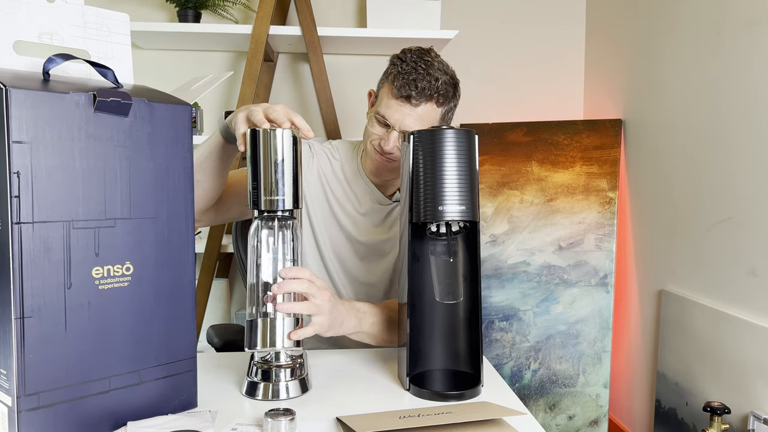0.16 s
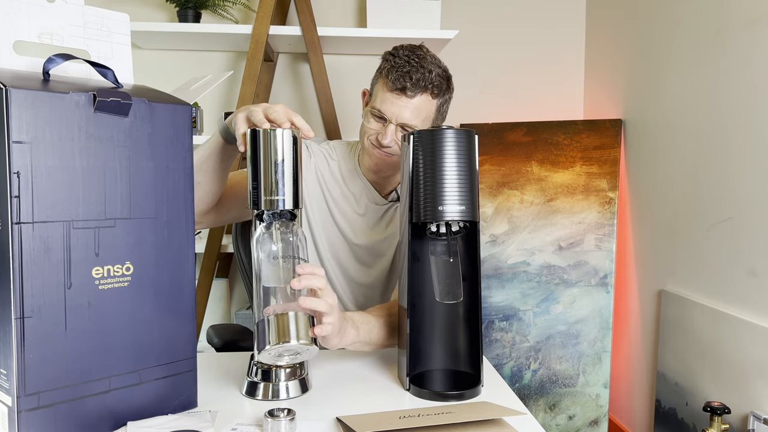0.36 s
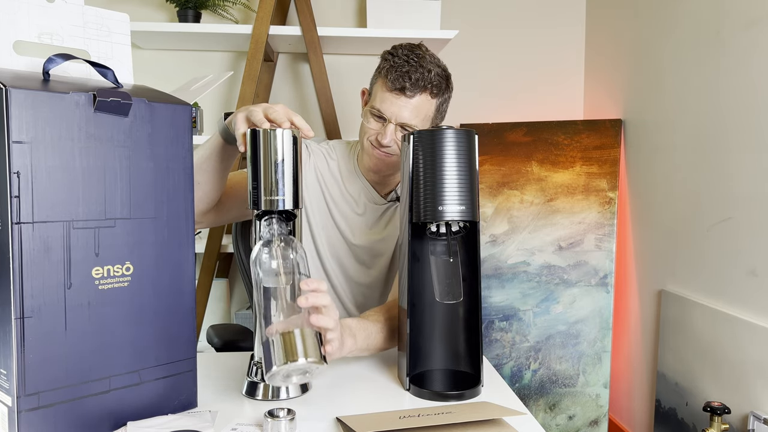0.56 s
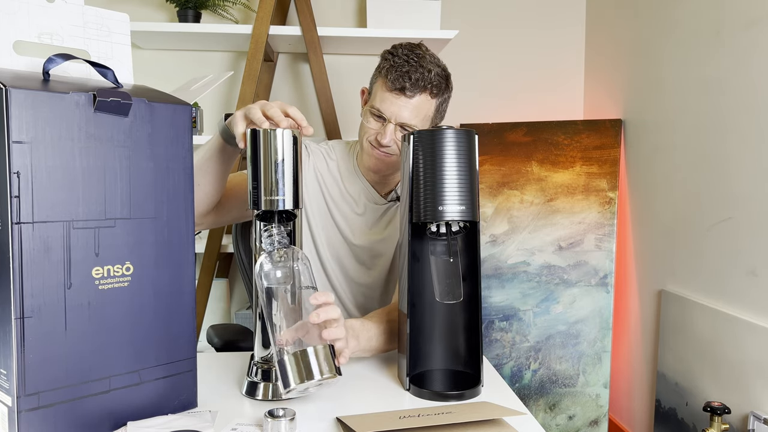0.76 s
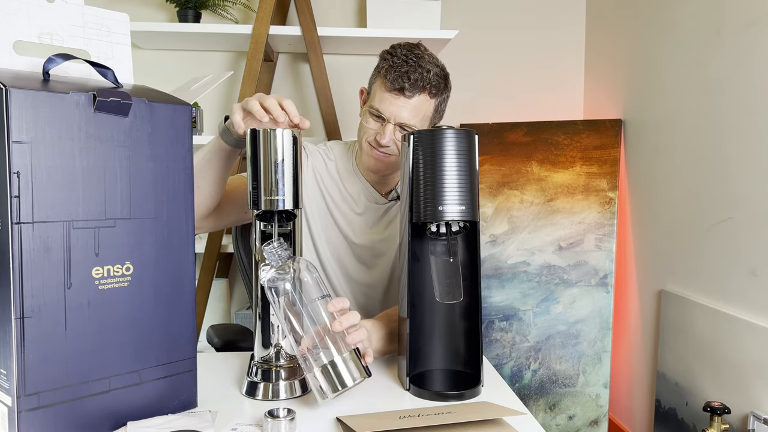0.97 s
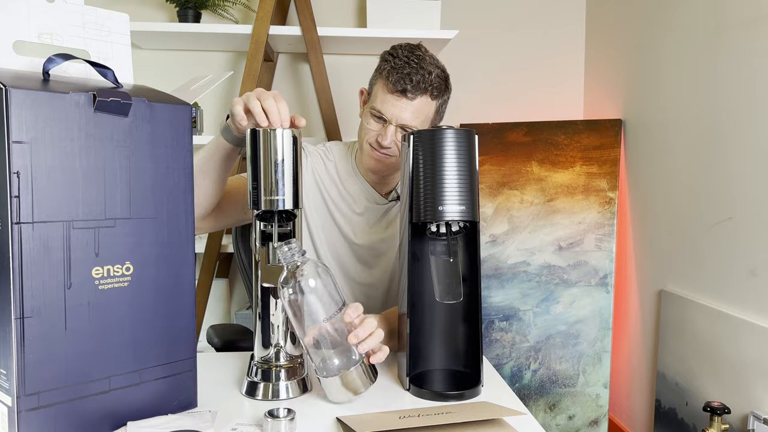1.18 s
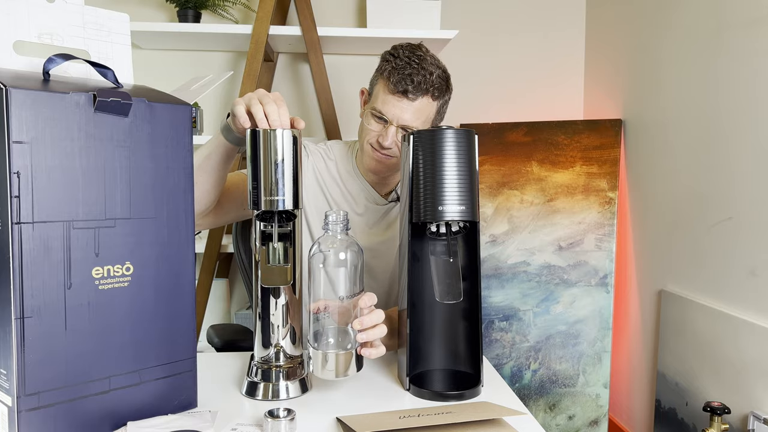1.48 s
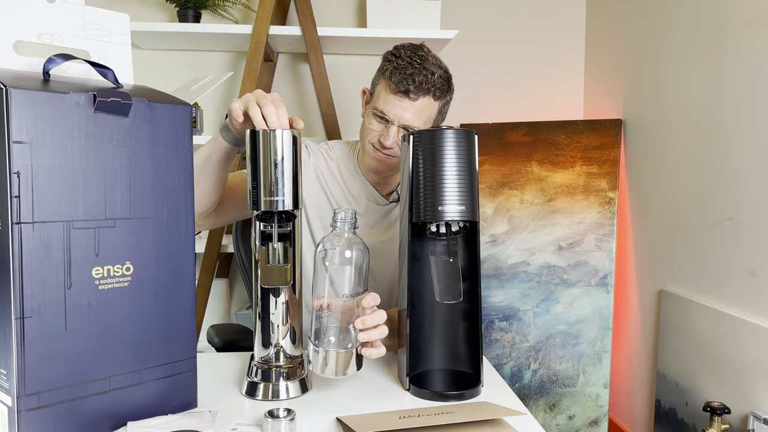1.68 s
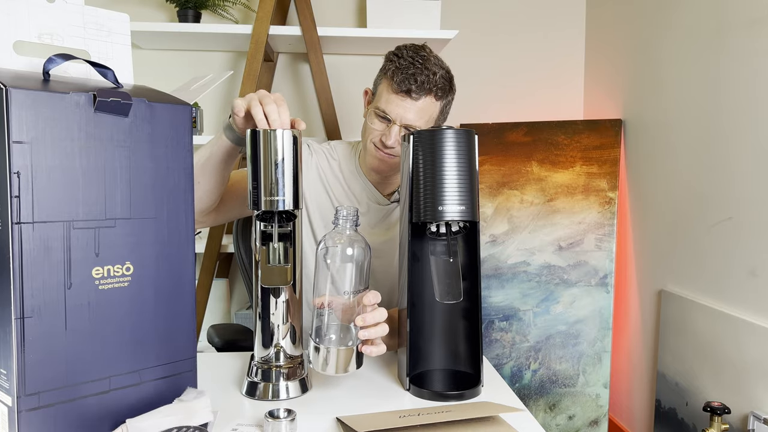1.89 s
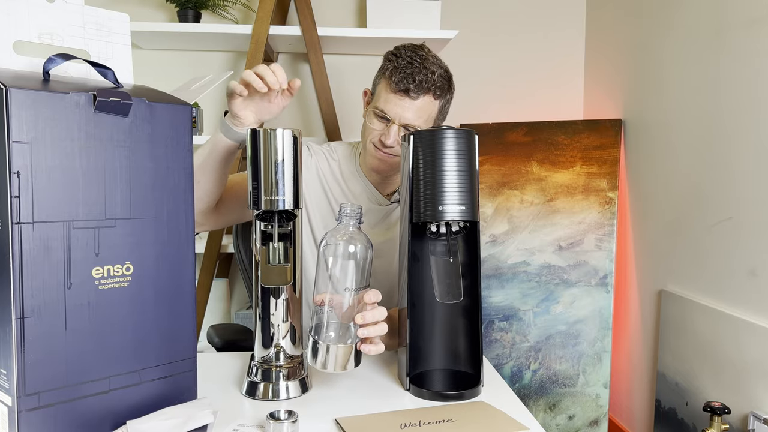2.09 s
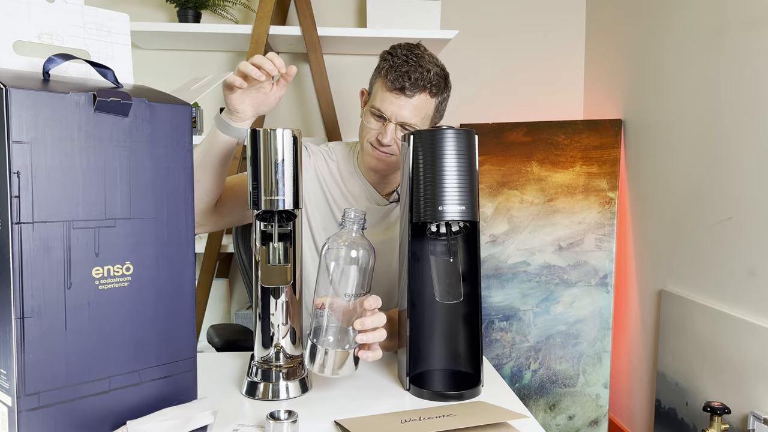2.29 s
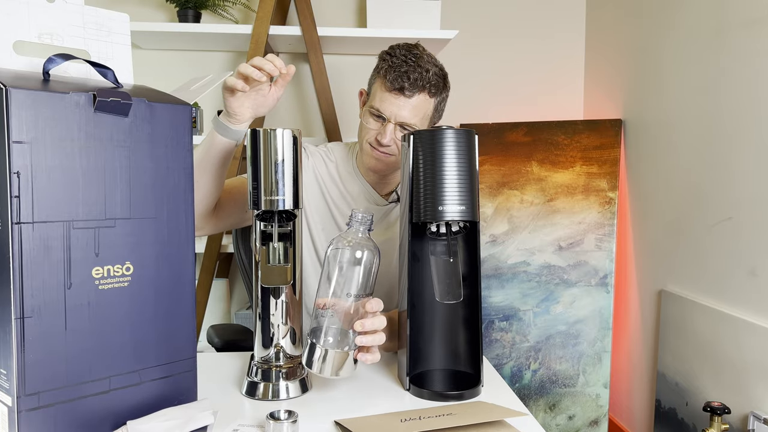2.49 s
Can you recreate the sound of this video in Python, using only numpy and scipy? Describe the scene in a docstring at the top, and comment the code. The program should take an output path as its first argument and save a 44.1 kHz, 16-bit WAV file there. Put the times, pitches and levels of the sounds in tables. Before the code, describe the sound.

Gas vents from a soda machine in a loud, bright, fading hiss. Before it come a thin leak, a sharp clack, a metallic clink and a hollow knock as the bottle is removed, heard close in a small room.

```python
"""Soda maker, close up

One microphone stands near the machine in a small room. As the bottle is taken out, gas leaks at its
neck until the seal lets go with a loud clack; the bottle clinks on the metal nozzle and knocks
hollowly on the stand. Then the top is pressed: the valve squeals open and carbon dioxide vents
in a bright hiss that sputters briefly and dies away."""
import sys
import numpy as np
from scipy import signal
from scipy.fft import rfft, irfft, next_fast_len
from scipy.io import wavfile
from scipy.ndimage import uniform_filter1d, minimum_filter1d

SR = 44100
rng = np.random.default_rng(int(sys.argv[2]) if len(sys.argv) > 2 else 0)


def persist_wave(psi):
    """Save psi, clipped to +-1, as 16-bit WAV."""
    counts = np.round(np.clip(psi, -1, 1) * 32767).astype(np.int16)
    wavfile.write(sys.argv[1], SR, np.atleast_2d(counts).T)


N = 116865
T = np.arange(N) / SR


def from_db(db):
    """Decibels to gain."""
    return 10 ** (np.asarray(db) / 20)


def at_hz(points, hz):
    """Read a table on a log-frequency axis."""
    table_hz, values = np.transpose(points)
    return np.interp(np.log(hz + 1e-9), np.log(table_hz), values)


def noise(colour, tilt_db=0):
    """Noise of a given colour, tilted by tilt_db per octave above 1 kHz."""
    size = next_fast_len(N)
    hz = np.maximum(np.fft.rfftfreq(size, 1 / SR), 20)
    octaves = np.log2(np.maximum(hz / 1000, 1))
    gain = from_db(at_hz(colour, hz) + tilt_db * octaves)
    return irfft(rfft(rng.standard_normal(size)) * gain, size)[:N]


def coloured(x, colour):
    """A minimum-phase filter with the given colour: nothing sounds early."""
    size = 2 * next_fast_len(N // 2 + SR // 4)
    gain = from_db(at_hz(colour, np.fft.rfftfreq(size, 1 / SR)))
    cepstrum = irfft(np.log(gain), size)
    cepstrum[1:size // 2] *= 2
    cepstrum[size // 2 + 1:] = 0
    return irfft(rfft(x, size) * np.exp(rfft(cepstrum)), size)[:N]


def wander(rate_hz):
    """Smooth random drift with a standard deviation of 1."""
    pole = np.exp(-2 * np.pi * rate_hz / SR)
    drift = signal.lfilter([1], [1, -2 * pole, pole * pole], rng.standard_normal(N + SR))[SR:]
    return drift / drift.std()


def decay(start_s, t60_s):
    """An envelope that jumps up at start_s and falls 60 dB in t60_s."""
    return (T >= start_s) * np.exp(-np.log(1000) * np.clip((T - start_s) / t60_s, 0, 10))


def ring(start_s, hz, t60_s):
    """One struck mode: a dying sine."""
    return np.sin(2 * np.pi * hz * (T - start_s)) * decay(start_s, t60_s)


def contact(start_s, t60_s, grit):
    """Force of a blow: a rough burst holds the share grit of the energy, a clean click the rest."""
    burst = decay(start_s, t60_s)
    force = np.sqrt(grit) * rng.standard_normal(N) * burst
    force[int(start_s * SR)] += np.sqrt((1 - grit) * np.sum(burst ** 2))
    return force


def struck(hits, colour, modes, room, crack_t60_s, grit, wet_db, ring_db):
    """Each hit cracks; the hardest rings the modes, which waver as if beating with room reflections."""
    force = sum(from_db(db) * contact(start_s, crack_t60_s, grit) for start_s, db in hits)
    hardest_s = max(hits, key=lambda hit: hit[1])[0]
    ringing = 0
    for k, (hz, db, t60_s) in enumerate(modes):
        waver = 1 + 0.3 * wander(rate_hz=22)
        ringing += (-1) ** k * from_db(db + ring_db) * ring(hardest_s, hz, t60_s) * waver
    return in_room(coloured(force, colour), room, wet_db) + ringing


# Reverberation of the small room: frequency_hz, t60_s
ROOM_DECAY = [(60, 0.44), (200, 0.96), (1000, 0.59), (3000, 0.66), (8000, 0.45), (13000, .25)]


def room_response(gap_s=0.006):
    """The walls answer after gap_s: dense early reflections and a tail that dies band by band."""
    tail, edges_hz = 0, np.geomspace(30, 18000, 12)
    for low, high in zip(edges_hz, edges_hz[1:]):
        bandpass = signal.butter(2, [low, high], "band", fs=SR, output="sos")
        band = signal.sosfilt(bandpass, rng.standard_normal(N))
        tail += band * decay(gap_s, at_hz(ROOM_DECAY, np.sqrt(low * high)))
    early = from_db(8) * rng.standard_normal(N) * decay(gap_s, t60_s=0.16)
    response = (early + tail)[:SR]
    return response / np.sqrt(np.sum(response ** 2))


def in_room(x, room, wet_db):
    """The direct sound reaches the microphone, then its reflections."""
    return x + from_db(wet_db) * signal.fftconvolve(x, room)[:N]


# Echoes off hard surfaces close to the machine: delay_ms, gain
NEAR_ECHOES = [(.9, 0.067), (2.3, 0.078), (4.1, 0.067)]


def near_surfaces(x):
    """Close reflections ripple the colour of a hiss."""
    return x + sum(gain * np.interp(T - ms / 1000, T, x, left=0) for ms, gain in NEAR_ECHOES)


# The quiet room at the microphone: frequency_hz, density_db
ROOM_COLOUR = [(25, -38.5), (70, -32), (100, -43), (170, -34.5), (290, -47.5), (400, -48), (900, -52),
               (2000, -64.5), (4000, -70), (16000, -77)]


def room_tone(hum_hz=289.4, hum_db=-64.5):
    """Low background noise with a faint, slightly wavering hum."""
    waver = 1 + 0.13 * wander(rate_hz=2.3)
    hum = from_db(hum_db) * waver * np.sin(2 * np.pi * hum_hz * T)
    return hum + noise(ROOM_COLOUR)


# Plastic on plastic, for rubs and taps: frequency_hz, density_db
PLASTIC_COLOUR = [(40, -50), (300, -26.5), (650, -15), (1700, -17), (2800, -26), (4000, -33), (5500, -33),
                  (8000, -39), (12000, -34), (16000, -58)]
# Slides in the holder: start_s, length_s, level_db, ring_hz, ring_db, tilt_db_per_octave
RUBS = [(.77, 0.21, -26, 292.4, -25.5, -13), (1.396, 0.082, -32.5, 4500, -33, 2)]


def bottle_rubs(pitch_spread=0.035):
    """The bottle rubs on its holder: soft sliding noise with one rough resonance."""
    out = 0
    for start_s, length_s, db, ring_hz, ring_db, tilt_db in RUBS:
        progress = np.clip((T - start_s) / length_s, 0, 1)
        stroke = np.sqrt(np.abs(np.sin(np.pi * progress)))
        hz = ring_hz * (1 + pitch_spread * wander(ring_hz * pitch_spread))
        tone = np.sin(2 * np.pi * np.cumsum(hz) / SR)
        out += from_db(db) * stroke * (noise(PLASTIC_COLOUR, tilt_db) + from_db(ring_db) * tone)
    return out


# Light plastic taps and creaks: start_s, level_db, ring_hz, ring_db, tilt_db_per_octave
TAPS = [(0.055, -10.5, 1720, -28, 3), (.155, -0.5, 760, -36.5, -0.5), (0.18, -1.5, 1870, -37, -8.5),
        (0.1922, 0, 1903, -30, 4.5), (0.43, -17.5, 1100, -33.5, -0.5), (0.514, -9, 1810, -47.5, 4.5),
        (.5305, 2, 1764, -27.5, 3), (1.012, -8, 1360, -29, -5), (1.056, -5, 1107, -22, -5),
        (1.066, 6.5, 1170, -39, -1.5), (1.3695, -15.5, 588, -14.5, 2), (1.3765, -10, 780, -23.5, -3.5)]


def bottle_taps(attack_s=0.0025):
    """The bottle shifts in its holder: small ticks, each with one brief resonance."""
    out = 0
    for start_s, db, ring_hz, ring_db, tilt_db in TAPS:
        attack = np.clip((T - start_s) / attack_s, 0, 1)
        tick = noise(PLASTIC_COLOUR, tilt_db) * decay(start_s, t60_s=0.045)
        resonance = from_db(ring_db) * ring(start_s, ring_hz, t60_s=0.06)
        out += from_db(db) * attack * (tick + resonance)
    return out


# Course of the leak at the neck: time_s, level_db
LEAK_LEVEL = [(0, 4.5), (.12, 5), (.22, 9.5), (.33, -12), (.5, -29), (.7, -8), (.98, -10.5), (1.2, -11),
              (1.33, -24), (1.44, -22), (1.52, -28), (1.61, -22), (1.72, -28)]
# Its hiss: frequency_hz, density_db
LEAK_COLOUR = [(300, -47.5), (1200, -46), (1700, -48.5), (2400, -47), (3200, -42.5), (4600, -49.5),
               (6300, -43), (7800, -42.5), (9500, -46), (11800, -41), (14000, -44.5), (16000, -54.5)]


def neck_leak():
    """Gas seeps past the neck in a thin hiss that comes and goes, fading as the pressure drops."""
    return noise(LEAK_COLOUR) * from_db(np.interp(T, *np.transpose(LEAK_LEVEL)))


# Whistles at the neck, then the valve: start_s, length_s, start_hz, end_hz, level_db, width_hz
WHISTLES = [(0, 0.33, 11200, 10950, -42.5, 486), (0.269, .022, 13100, 13300, -23, 700),
            (.272, 0.075, 13900, 14000, -34, 700), (1.213, .19, 13400, 10200, -59, 400),
            (1.789, 0.019, 6480, 6910, -25.5, 130), (1.787, 0.033, 9760, 9100, -29.5, 700),
            (1.789, 0.045, 3520, 3300, -35, 440), (1.802, 0.02, 2220, 2320, -28.5, 70),
            (1.81, 0.099, 2287, 2270, -30, 24.8)]


def gap_whistles(attack_share=0.22):
    """Gas sings in unsteady glides that swell quickly and fade as a narrow gap opens or shuts."""
    out = 0
    for start_s, length_s, start_hz, end_hz, db, width_hz in WHISTLES:
        progress = np.clip((T - start_s) / length_s, 0, 1)
        hz = start_hz + (end_hz - start_hz) * progress + width_hz / 2 * wander(width_hz)
        swell = np.interp(progress, [0, attack_share, 1], [0, 1, 0]) ** 1.5
        out += 2 * from_db(db) * swell * np.sin(2 * np.pi * np.cumsum(hz) / SR)
    return out


# Bottle against nozzle: start_s, level_db
CLINKS = [(.5405, -29), (.5797, -3), (.5818, 2.5), (.5845, 5)]
# The contact's spectrum: frequency_hz, gain_db
CLINK_COLOUR = [(40, -26), (250, -24), (700, -15.5), (1000, 1), (1350, -12.5), (1800, 3.5), (2100, -12.5),
                (2400, -4.5), (3400, -11.5), (5000, -16), (7000, -35.5), (12000, -24), (16000, -50)]
# Modes of the nozzle: pitch_hz, level_db, t60_s
NOZZLE_MODES = [(133, -35, .3), (1040, -26, 0.33), (1164, -34.5, 0.72), (1715, -39.5, 0.8),
                (1850, -30.5, .3), (1927, -36.5, 0.49), (2420, -42, 0.58), (3040, -31.5, .31),
                (2915, -33.5, 0.42), (3176, -47.5, .6), (3838, -45, .28), (4312, -49, 0.23)]


def nozzle_clink(room):
    """The bottle catches the metal nozzle and sets it ringing."""
    return struck(CLINKS, CLINK_COLOUR, NOZZLE_MODES, room,
                  crack_t60_s=0.018, grit=0.94, wet_db=-5, ring_db=-1.5)


# Bottle against stand: start_s, level_db
KNOCKS = [(1.0957, 3), (1.1115, -10.5)]
# The contact's spectrum: frequency_hz, gain_db
KNOCK_COLOUR = [(40, -24), (150, -2), (280, -8.5), (500, 0), (680, -4), (820, 10), (1080, 13), (1450, -3.5),
                (1800, 0.5), (2400, -16.5), (6000, -31), (12000, -28), (16000, -47.5)]
# Modes of the bottle: pitch_hz, level_db, t60_s
BOTTLE_MODES = [(118.8, -35.5, 1), (172, -26, 0.6), (385, -24.5, 0.25), (522, -35.5, 0.48),
                (639, -33.5, .4), (815, -26, 0.34), (904, -37.5, 0.19), (972, -34.5, 0.39),
                (1050, -20, 0.16), (1060, -30, .18)]


def bottle_knock(room):
    """The hollow bottle knocks on the stand and resonates."""
    return struck(KNOCKS, KNOCK_COLOUR, BOTTLE_MODES, room,
                  crack_t60_s=0.02, grit=0.5, wet_db=-4, ring_db=0.5)


# Jolts as the seal gives way: start_s, level_db
CLACKS = [(.2203, -12), (.2232, 10), (.2272, 1.5), (.2385, -2.5)]
# The burst's spectrum: frequency_hz, gain_db
CLACK_COLOUR = [(30, -12), (70, -15), (90, -12.5), (160, 0.5), (310, -2), (510, 6.5), (700, 0), (1070, 7.5),
                (1400, -5.5), (2400, -7), (5500, -13), (9000, -12.5), (11500, -4.5), (16000, -23)]
# Low boom of the room and ringing of the housing after the clack: pitch_hz, level_db, t60_s
CLACK_MODES = [(44.9, -43.5, .7), (72.5, -33.5, 0.56), (116, -33.5, 1), (177, -32.5, 0.64),
               (205, -46.5, 0.74), (367, -35, 0.33), (546.6, -12.5, 0.18), (1156, -20, .16),
               (1660, -33.5, .2)]


def seal_clack(room):
    """The seal lets go in a rough burst; the room booms low and the housing rings above it."""
    return struck(CLACKS, CLACK_COLOUR, CLACK_MODES, room,
                  crack_t60_s=0.063, grit=1.0, wet_db=-8, ring_db=1)


# Puffs at the vent: start_s, level_db
SPUTTERS = [(1.785, -7), (1.933, -2), (1.942, -1), (1.956, -0.5), (1.9633, -1.5), (2.011, -5.5)]
# Their spectrum: frequency_hz, density_db
SPUTTER_COLOUR = [(30, -43), (120, -14.5), (350, -12), (800, -14.5), (1500, -16.5), (2000, -21.5),
                  (4000, -24), (16000, -39)]


def jet_sputters(t60_s=0.053):
    """The jet sputters in low, rough puffs."""
    puffs = sum(from_db(db) * decay(start_s, t60_s) for start_s, db in SPUTTERS)
    return noise(SPUTTER_COLOUR) * puffs


# Gas flow through the open valve: time_s, level_db
VALVE_FLOW = [(1.772, -42), (1.783, -28.5), (1.79, -16.5), (1.814, -7.5), (1.865, -0.5), (1.96, -0.5),
              (2.06, -2.5), (2.23, -7.5), (2.38, -13), (2.5, -18), (2.65, -25.5)]
# The jet from close by: frequency_hz, density_db
JET_COLOUR = [(30, -29), (170, -25), (450, -30), (1100, -23), (1900, -26.5), (3500, -26.5), (5800, -22.5),
              (6400, -18), (7300, -16.5), (8400, -17), (9600, -13), (10500, -13), (12100, -5.5),
              (13500, -9), (16000, -26)]


def vent_jet(flicker_db=0.6, dulling_db_per_db=0.013, treble_hz=6000):
    """Venting gas makes a turbulent hiss; its treble fades a little faster than the flow."""
    flow_db = np.interp(T, *np.transpose(VALVE_FLOW))
    valve_open = T > VALVE_FLOW[0][0]
    hiss = noise(JET_COLOUR) * from_db(flow_db + flicker_db * wander(rate_hz=28)) * valve_open
    low = signal.sosfilt(signal.butter(1, treble_hz, fs=SR, output="sos"), hiss)
    return low + (hiss - low) * from_db(dulling_db_per_db * flow_db)


def scene():
    """Machine and room at one microphone position, the same in both channels."""
    room = room_response()
    blows = seal_clack(room) + nozzle_clink(room) + bottle_knock(room)
    handling = in_room(bottle_taps() + bottle_rubs(), room, wet_db=-6)
    whistles = in_room(gap_whistles(), room, wet_db=-15)
    hiss = near_surfaces(neck_leak() + vent_jet())
    sputters = in_room(jet_sputters(), room, wet_db=-1.5)
    return np.tile(room_tone() + handling + whistles + blows + sputters + hiss, (2, 1))


def record(dry, limiter_window_s=0.0017, overload_at=0.74, stopband_hz=16900):
    """After the microphone: a fast limiter, slight overload on the loudest blows, a steep low-pass."""
    window = int(limiter_window_s * SR)
    gain = np.minimum(1, 1 / (np.abs(dry).max(axis=0) + 1e-9))
    smooth_gain = uniform_filter1d(minimum_filter1d(gain, window), window)
    lowpass = signal.cheby2(16, 70, stopband_hz, fs=SR, output="sos")
    return signal.sosfilt(lowpass, np.clip(dry * smooth_gain, -overload_at, overload_at))


dry = scene()
out = record(dry)
persist_wave(out)
```